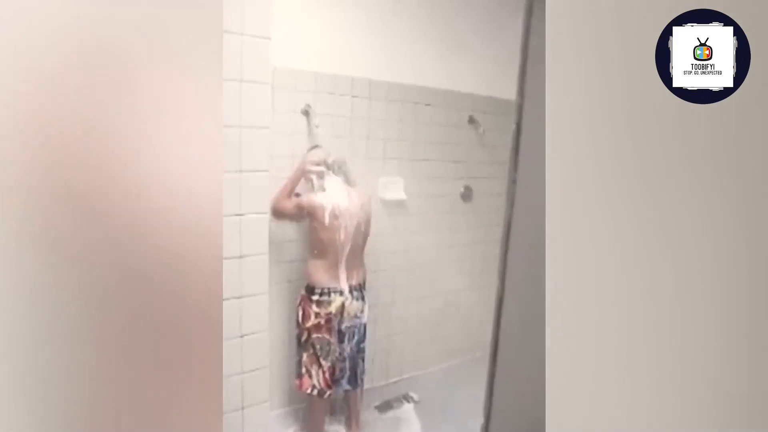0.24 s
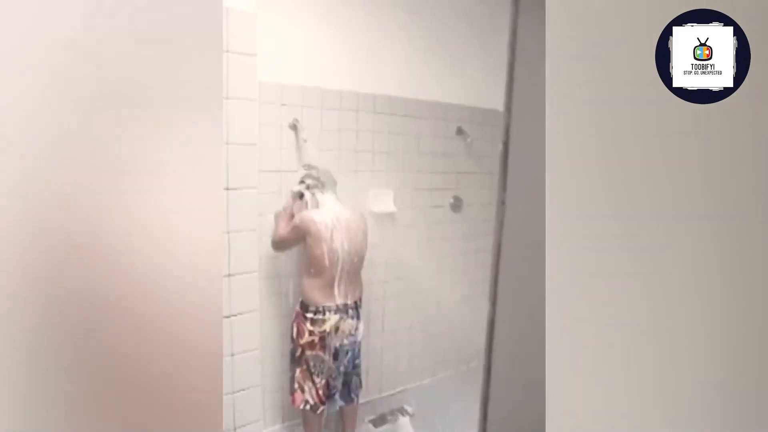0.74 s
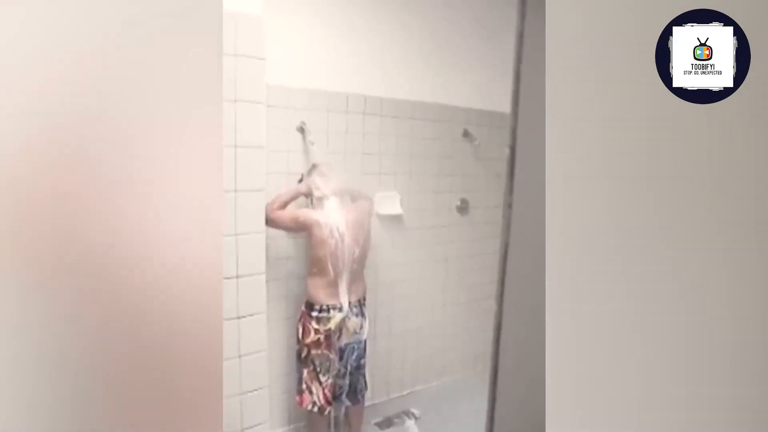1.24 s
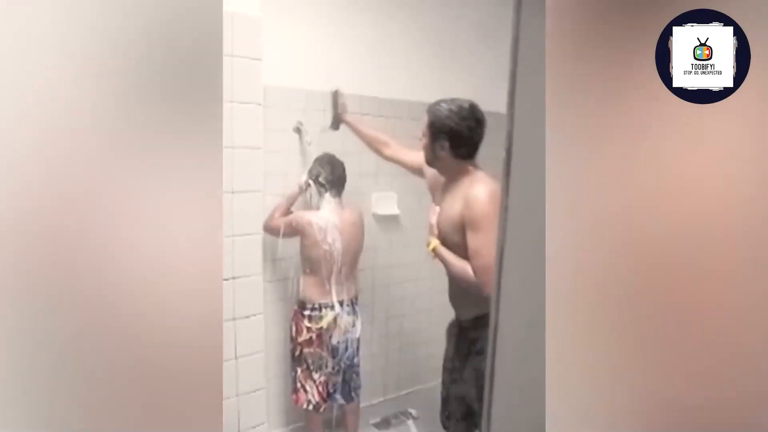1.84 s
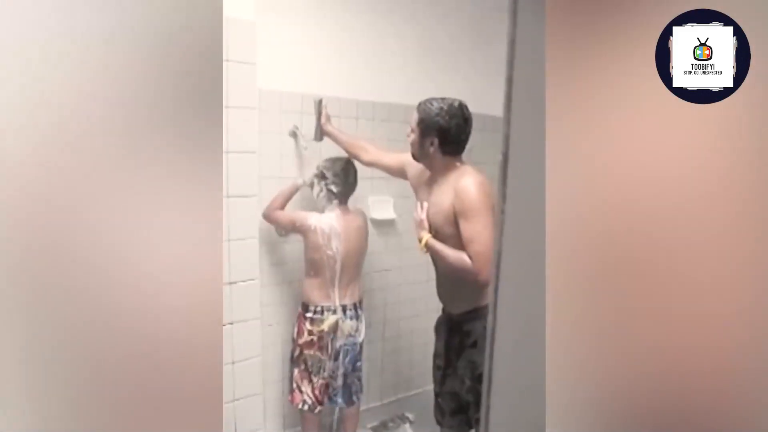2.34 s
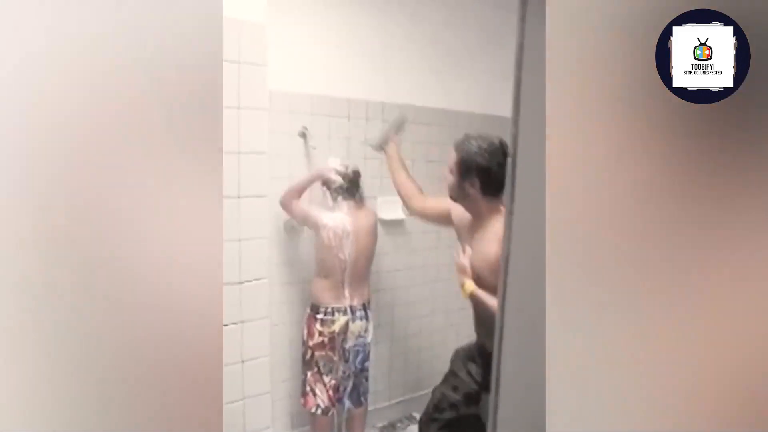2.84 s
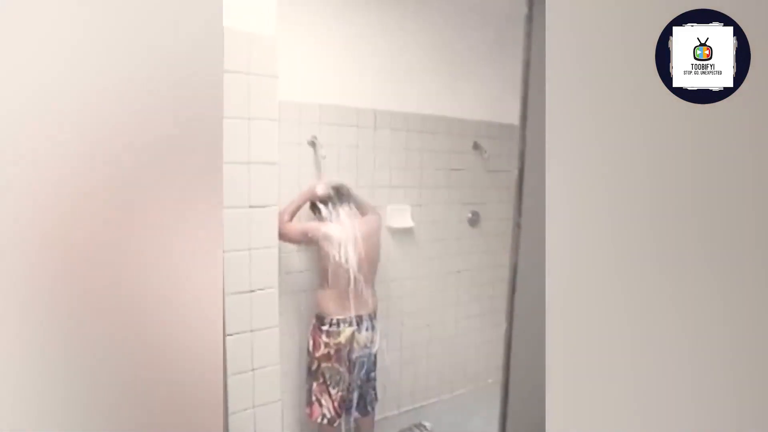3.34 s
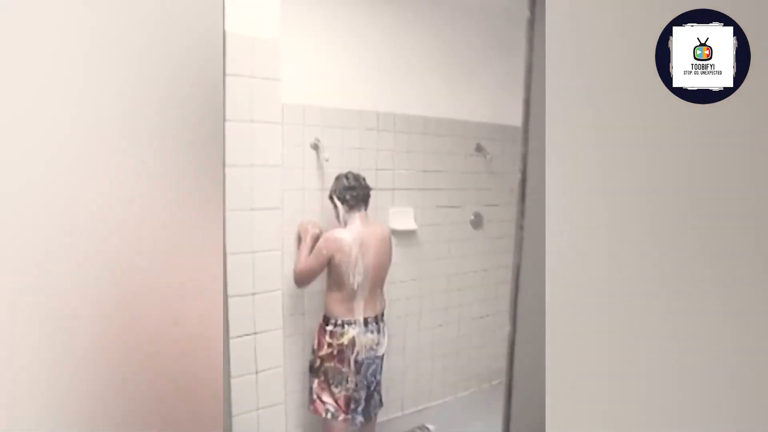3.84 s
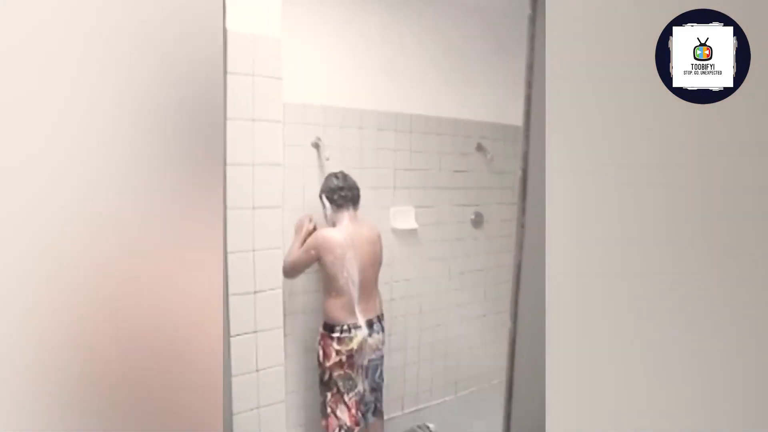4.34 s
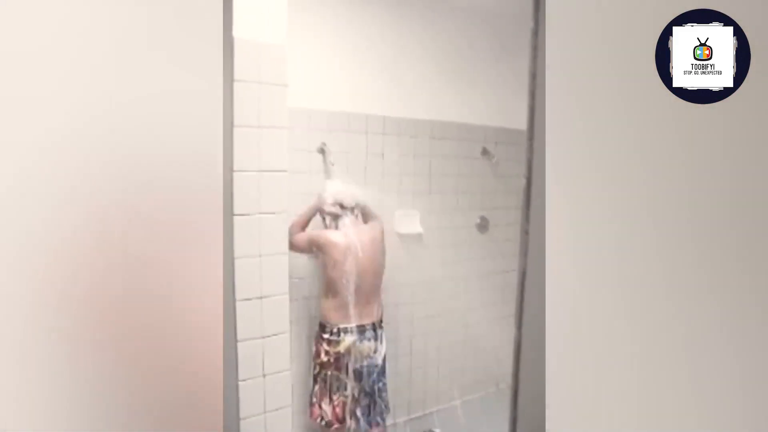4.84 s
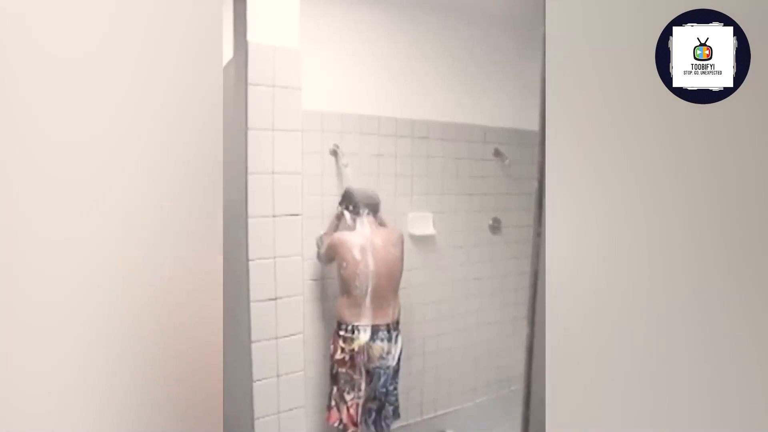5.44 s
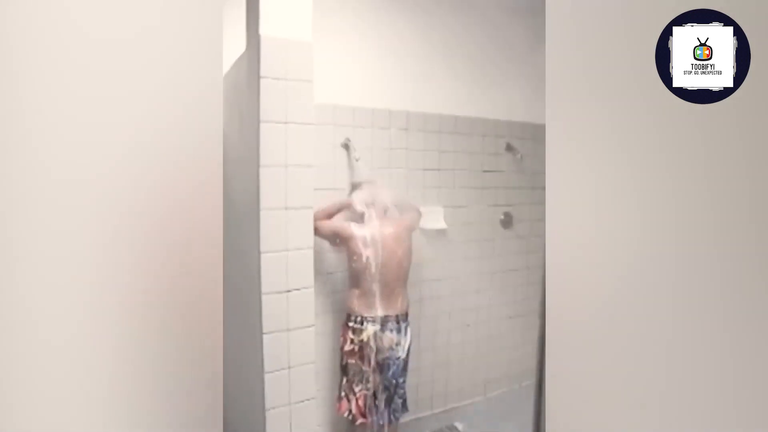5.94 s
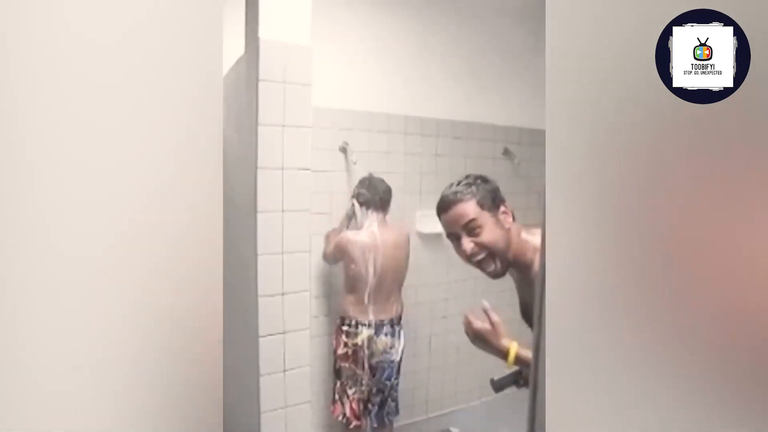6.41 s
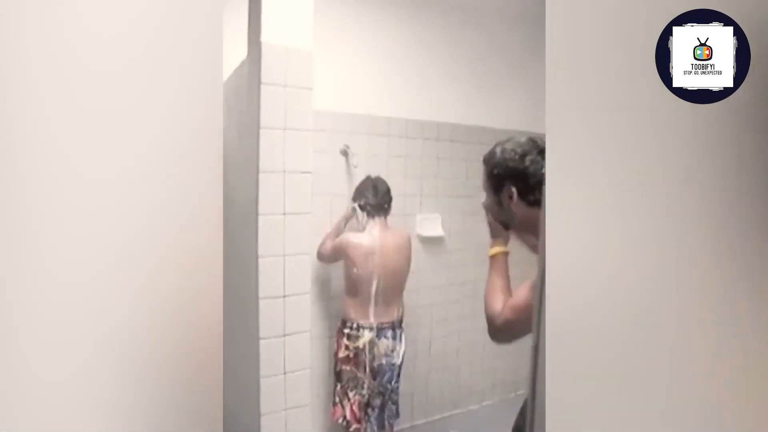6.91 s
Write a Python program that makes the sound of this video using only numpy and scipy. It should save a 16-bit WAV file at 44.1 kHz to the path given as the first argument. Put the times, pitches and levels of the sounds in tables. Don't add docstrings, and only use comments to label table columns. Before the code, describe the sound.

From 0 to 7 seconds a shower runs without stopping in a hard tiled room. Fine spray makes a bright, dense hiss; larger drops splash, and run-off slaps lower down over a smooth, soft wash. The water surges unevenly as the bather moves, with small splats near 0.1, 0.6, 1.4, 2.3 and 3 seconds. Very short level dips occur at 0.5, 1.3 and 3.3. From 3.6 the gripping hand gives a small creak, then faint low and higher creaks while the water thins. At 4.1 a sharp snap starts a tenth-of-a-second hollow, ringing rub on the phone case; a much fainter rub follows at 4.5. The splashing then fills out again, dipping slightly near 5.4. Brighter splats cluster at 5.9 to 6.4, with a fuller gush, and the spray continues to the end. Mono, close, with treble steeply cut.

```python
import sys
import numpy as np
from scipy import signal
from scipy.fft import rfft, irfft, next_fast_len
from scipy.io import wavfile

SR = 44100
rng = np.random.default_rng(int(sys.argv[2]) if len(sys.argv) > 2 else 0)


def ratio_of_db(decibels):
    return 10 ** (np.asarray(decibels, float) / 20)


def to_wav(s):
    ch = np.atleast_2d(s).T
    pcm = np.round(np.clip(ch, -1, 1) * 32767)
    wavfile.write(sys.argv[1], SR, pcm.astype(np.int16))


N = 316318

# frequency in Hz, level in dB per Hz.
SPRAY_TONE = [(1300, -24), (2200, -18), (3200, -4), (4400, 0), (5200, -2.5), (6200, -5), (7600, 3)]
SPLASH_TONE = [(900, -32), (1500, -9.5), (2000, -3), (2800, -2.5), (3500, -5), (5000, -15.5)]
SLAP_TONE = [(350, -19), (600, -7.5), (900, -1), (1300, -2), (1700, -3.5), (2600, -27)]
WASH_TONE = [(15, 0), (40, -5), (90, 0), (160, -2.5), (300, -1.5), (550, -3), (800, -10), (1400, -31.5)]
HISS_TONE = [(20, -4.5), (1000, -10.5), (4000, -1), (6000, 0), (8000, 2.5)]
# time in seconds, spray level in dB.
FLOW = [(0.0, -38), (0.12, -33), (0.24, -35.5), (0.98, -33), (1.18, -35.5), (1.86, -32.5), (2.79, -37.5),
        (3.17, -34), (3.22, -36.5), (3.99, -34), (4.27, -38), (4.43, -34.5), (5.51, -34.5), (5.89, -34),
        (6.13, -36), (6.19, -33.5), (6.25, -34), (7.17, -33)]
# peak in seconds,
# length in seconds, splash rise in dB, slap rise in dB.
GUSHES = [(0.0, .15, 4.5, 2), (0.664, 0.37, 3.5, -2), (0.858, 0.12, 2, -4.5), (0.927, 0.44, 3.5, -1),
          (1.2, 0.27, 0.8, 3), (1.429, 0.56, 4.5, 3), (2.304, 0.23, 2.5, 0.2), (2.77, 0.41, 0.2, 1),
          (3.117, .5, 4.5, 1), (3.46, .35, 2.5, 1.5), (3.764, 0.36, -6.5, -5), (4.021, 0.19, -3.5, -2),
          (4.591, 0.47, 5.5, 2.5), (4.846, .5, 5, 1), (5.08, 0.19, 2, 1), (5.458, 0.32, -2, -3.5),
          (5.656, .2, 1, -0.1), (5.9, 0.73, 3.5, 1), (6.362, 0.59, 6, 3.5), (7.02, 0.28, 2.5, -0.6)]
# start in seconds, end in seconds, level in dB, pitch in Hz, width in Hz.
SPLATS = [(.08, .16, -42, 3670, 1190), (.6, .73, -41.5, 2300, 900), (1.375, 1.5, -41.5, 1900, 1100),
          (1.58, 1.7, -42.5, 3100, 600), (2.24, 2.37, -40.5, 4410, 796), (2.97, 3.06, -42.5, 1690, 500),
          (3.12, 3.22, -41.5, 2790, 804), (4.50, 4.59, -43, 600, 708), (5.90, 5.95, -35.5, 3480, 1190),
          (6.172, 6.215, -34.5, 4660, 1186), (6.2, 6.28, -39.5, 4880, 898),
          (6.24, 6.345, -41.5, 1600, 70.5), (6.30, 6.43, -38.5, 1685, 506)]
# time in seconds, depth in dB, recovery in seconds.
DUCKS = [(.502, 5, 0.063), (.82, 1.5, 0.11), (1.34, 5.5, 0.042), (3.27, 3.5, .08), (3.66, 5, 0.071),
         (3.94, 5, 0.03), (3.989, 2.5, 0.15), (4.087, 5, 0.12), (4.221, 6, 0.15), (4.497, 1, .03),
         (4.59, 3.5, 0.024), (5.43, 4, 0.12), (6.435, 1, 0.083)]
# start in seconds, end in seconds, level in dB, pitch in Hz, width in Hz.
CREAKS = [
    (3.603, 3.63, -36, 956, 50.4),
    (3.63, 3.90, -53, 975, 41),
    (3.817, 3.94, -48.5, 280.5, 70.6),
    (3.89, 3.94, -44.5, 1035, 81),
    (4.054, 4.092, -52, 287, 60.6),
    (4.068, 4.088, -38.5, 3500, 1450),
]
# start in seconds, end in seconds, level in dB.
RUBS = [
    (4.125, 4.221, -30),
    (4.496, 4.579, -42.5),
]
# pitch in Hz, width in Hz, level in dB.
CASE_RINGS = [(276, 180, -14.5), (397, 120, -9.5), (694, 280, -11.5), (970, 91, -4.5), (1286, 170, -5),
              (1780, 130, -4.5), (2060, 200, -9), (2520, 97, -16.5)]
# time in seconds, level in dB, pitch in Hz, width in Hz.
SNAP = (4.1250, -20, 1750, 900)
# frequency in Hz, level in dB.
MICROPHONE_TONE = [(10, -1.5), (6000, 0), (6400, -4.5), (6800, -14.5), (7100, -28), (7450, -46.5),
                   (7700, -57)]

MEAN_FLOW_DB = -35
SPLASH_DB, SPLASH_FOLLOWS = -41, 0.74
SLAP_DB, SLAP_FOLLOWS = -45, 0.24
WASH_DB, WASH_FOLLOWS = -48.5, 0.16
SPRAY_GAINS, WASH_GAINS = 0.14, 0.55
ROOM_T60_S, ROOM_DB = 0.52, 1
HISS_DB = -41.5
CASE_TOP_HZ = 2550
OFFSET = -0.0033


def rms_one(x):
    return x / np.sqrt(np.mean(x ** 2) + 1e-20)


def colour(x, spectrum):
    hz, level_db = np.transpose(spectrum)
    size = next_fast_len(N)
    log_hz = np.log(np.fft.rfftfreq(size, 1 / SR) + 1)
    gain = ratio_of_db(np.interp(log_hz, np.log(hz), level_db, left=-90, right=-90))
    return rms_one(irfft(rfft(x, size) * gain, size)[:N])


def noise():
    return rng.standard_normal(N)


def drift(rate):
    r = np.exp(-80 * np.pi * rate / SR)
    slow = signal.lfilter([1], [1, -2 * r, r * r], rng.standard_normal(N // 40 + 2002))[2000:]
    return np.interp(np.arange(N) / 40, np.arange(len(slow)), rms_one(slow))


def resonance(x, hz, width_hz):
    r = np.exp(-np.pi * width_hz / SR)
    top = np.array([1, 0, -1]) * (1 - r * r) / 2
    bottom = [1, -2 * r * np.cos(2 * np.pi * hz / SR), r * r]
    return signal.lfilter(top, bottom, x + 1e-18)


def double_resonance(x, hz, width_hz):
    return resonance(resonance(x, hz, width_hz), hz, width_hz)


def clicks(per_s, spread_db):
    sizes = ratio_of_db(spread_db * np.minimum(rng.exponential(1, N), 4))
    signs = rng.choice([-1, 1], N)
    return sizes * signs * (rng.random(N) < per_s / SR)


def gate(start_s, end_s, edge_s):
    t = np.arange(N) / SR
    return np.clip(np.minimum(t - start_s, end_s - t) / edge_s, 0, 1)


def bursts(rows):
    source = noise()
    total = np.zeros(N)
    for start_s, end_s, db, hz, width_hz in rows:
        burst = rms_one(double_resonance(source, hz, width_hz))
        total += ratio_of_db(db) * gate(start_s, end_s, (end_s - start_s) / 4) * burst
    return total


def drops(spectrum, per_s, sharpness, clump_db, patchy_db):
    hits = clicks(per_s * ratio_of_db(clump_db * drift(14)), spread_db=1.5)
    size_classes = 10
    size_class = rng.integers(0, size_classes, N)
    rings = np.zeros(N)
    for k, hz in enumerate(np.geomspace(spectrum[0][0], spectrum[-1][0], size_classes)):
        ring = rms_one(resonance(hits * (size_class == k), hz, hz / sharpness))
        rings += ring * np.sqrt(hz) * ratio_of_db(patchy_db * drift(1.7))
    return colour(rings, spectrum)


def tiled_room(x, spectrum):
    r = ratio_of_db(-120 / (ROOM_T60_S * SR))
    power = signal.lfilter([1 - r], [1, -r], x ** 2, zi=[r])[0]
    return rms_one(x + ratio_of_db(ROOM_DB) * np.sqrt(power) * colour(noise(), spectrum))


def gushes():
    peak_s, length_s, splash_rise, slap_rise = np.transpose(GUSHES)[..., None]
    phase = np.clip((np.arange(N) / SR - peak_s) / length_s, -0.5, 0.5)
    hump = np.cos(np.pi * phase) ** 2
    return (splash_rise * hump).sum(axis=0), (slap_rise * hump).sum(axis=0)


def shower():
    flow_db = np.interp(np.arange(N) / SR, *np.transpose(FLOW))
    swing = flow_db - MEAN_FLOW_DB
    splash_rise, slap_rise = gushes()
    spray_db = flow_db + SPRAY_GAINS * splash_rise
    splash_db = SPLASH_DB + SPLASH_FOLLOWS * swing + splash_rise
    slap_db = SLAP_DB + SLAP_FOLLOWS * swing + slap_rise
    wash_db = WASH_DB + WASH_FOLLOWS * swing + WASH_GAINS * slap_rise

    spray = drops(SPRAY_TONE, per_s=9000, sharpness=4.8, clump_db=1.5, patchy_db=0.0)
    splash = drops(SPLASH_TONE, per_s=3000, sharpness=2.8, clump_db=1.5, patchy_db=0.2)
    slap = drops(SLAP_TONE, per_s=1500, sharpness=3.1, clump_db=2.5, patchy_db=1.46)

    water = ratio_of_db(spray_db) * tiled_room(spray, SPRAY_TONE)
    water += ratio_of_db(splash_db) * tiled_room(splash, SPLASH_TONE)
    water += ratio_of_db(slap_db) * tiled_room(slap, SLAP_TONE)
    return water + ratio_of_db(wash_db) * colour(noise(), WASH_TONE)


def steady_hiss():
    return ratio_of_db(HISS_DB) * colour(noise(), HISS_TONE)


def splats():
    return bursts(SPLATS)


def gain_control(water):
    t = np.arange(N) / SR
    duck_db = np.zeros(N)
    for start_s, depth_db, recovery_s in DUCKS:
        fall = np.clip((t - start_s) / 0.004, 0, 1)
        recovery = np.clip(1 - (t - start_s) / recovery_s, 0, 1)
        duck_db += depth_db * fall * recovery
    return water * ratio_of_db(-duck_db)


def creaks():
    return bursts(CREAKS)


def snap():
    start_s, db, hz, width_hz = SNAP
    ring = double_resonance(np.arange(N) == round(start_s * SR), hz, width_hz)
    return ratio_of_db(db) * ring / np.abs(ring).max()


def finger_rubs():
    slips = clicks(12000, spread_db=1.5)
    body = np.zeros(N)
    for k, (hz, width_hz, db) in enumerate(CASE_RINGS):
        body += ratio_of_db(db) * (-1) ** k * resonance(slips, hz, width_hz)
    low_pass = signal.butter(6, CASE_TOP_HZ, fs=SR, output="sos")
    body = rms_one(signal.sosfilt(low_pass, body))
    return body * sum(ratio_of_db(db) * gate(start_s, end_s, 0.0013) for start_s, end_s, db in RUBS)


def scene():
    water = shower() + steady_hiss() + splats()
    handling = creaks() + snap() + finger_rubs()
    mono = gain_control(water) + handling
    return np.array([mono, mono])


def roll_off(x):
    return signal.sosfilt(signal.butter(12, 7450, fs=SR, output="sos"), x)


def record(dry):
    narrow = colour(dry[0], MICROPHONE_TONE) * np.std(dry[0])
    return roll_off(np.array([narrow, narrow]) + OFFSET)


dry = scene()
out = record(dry)
to_wav(out)
```